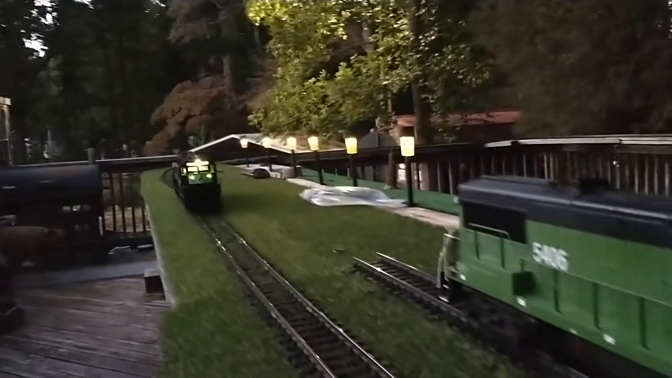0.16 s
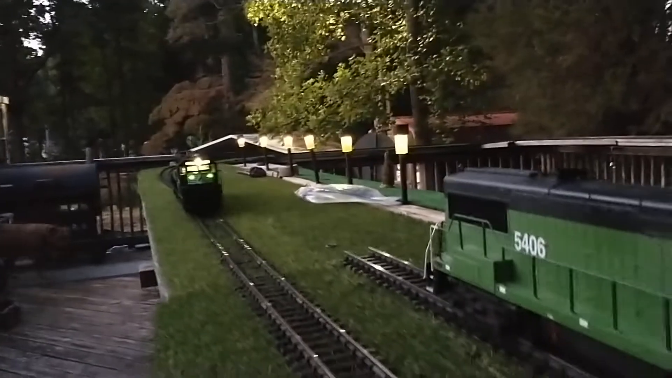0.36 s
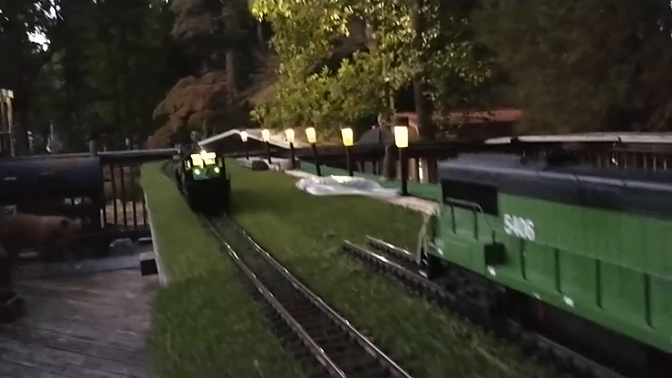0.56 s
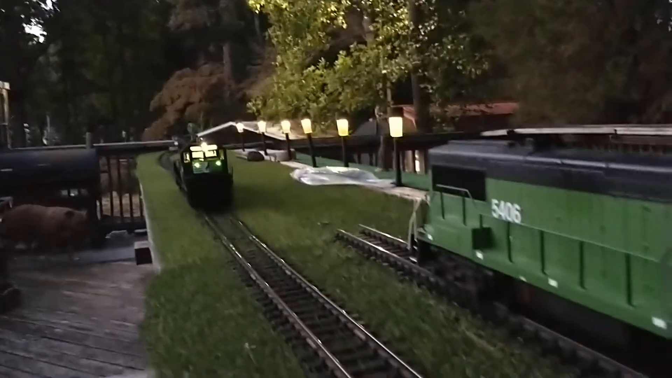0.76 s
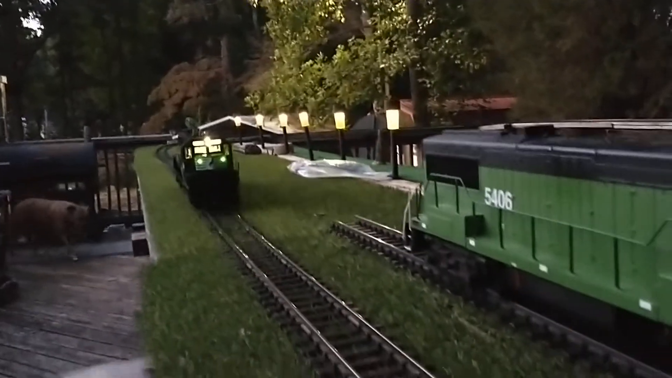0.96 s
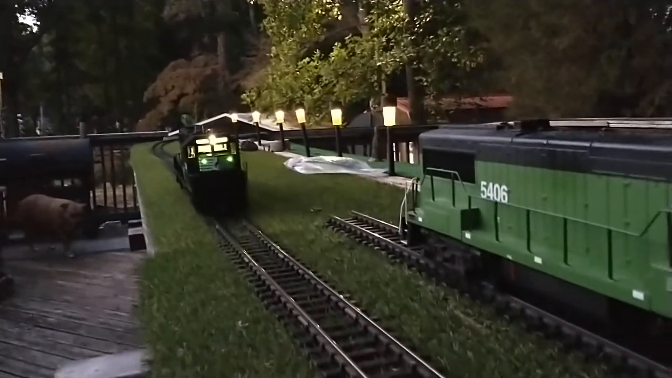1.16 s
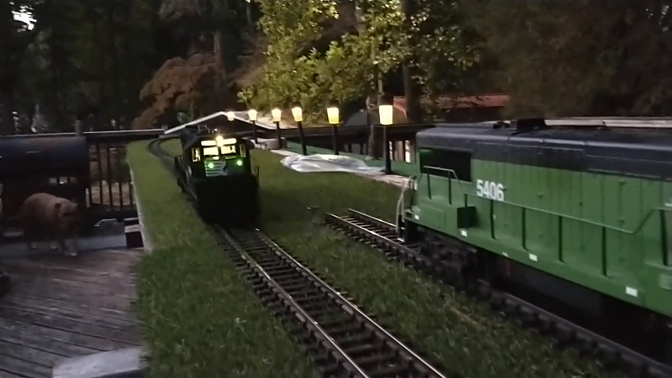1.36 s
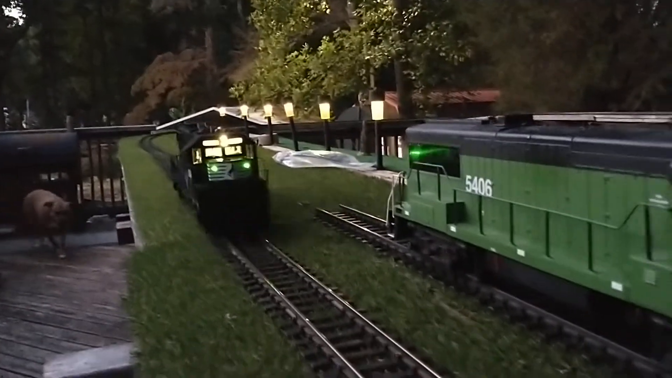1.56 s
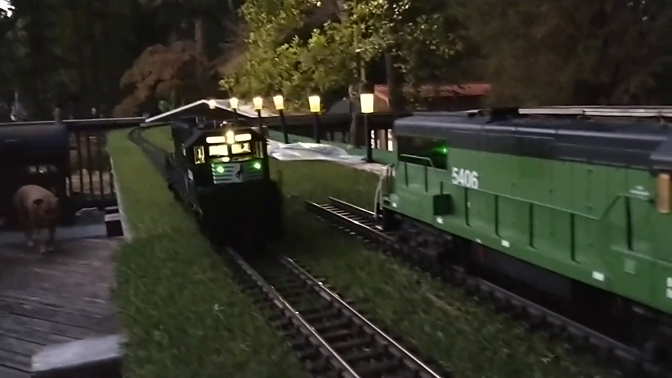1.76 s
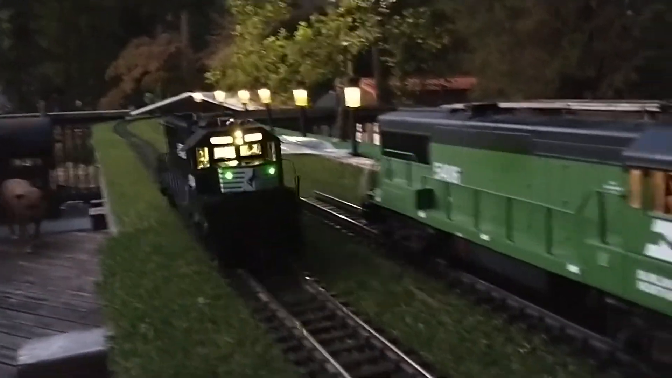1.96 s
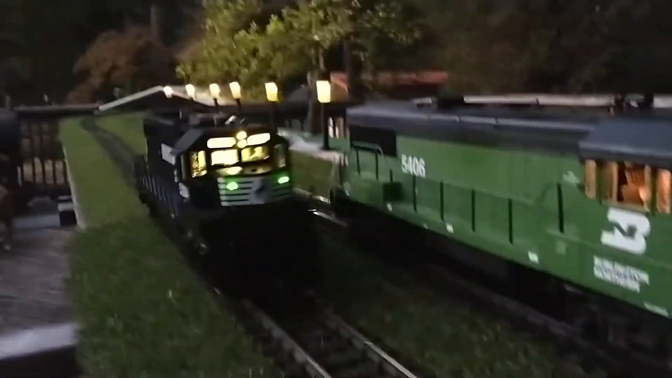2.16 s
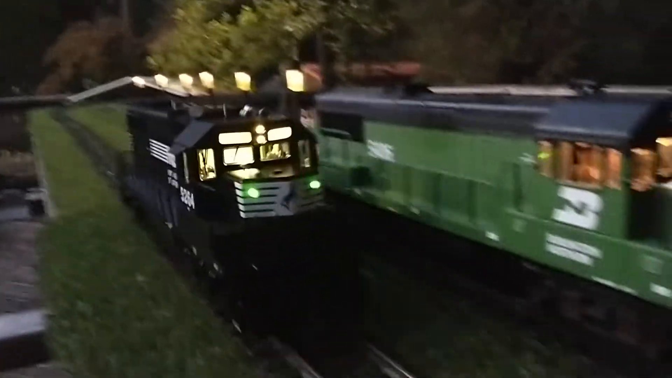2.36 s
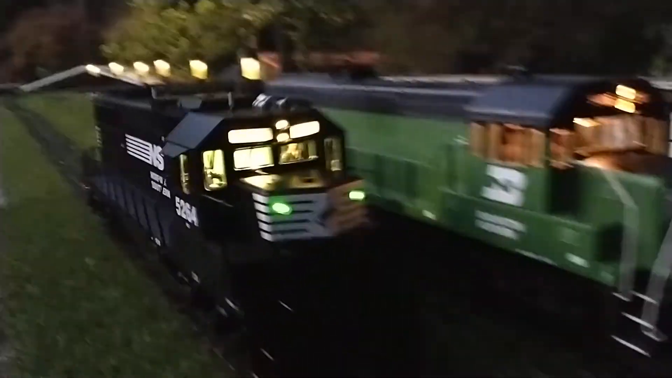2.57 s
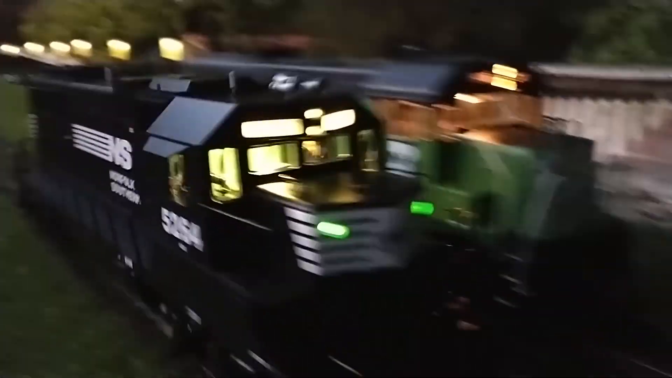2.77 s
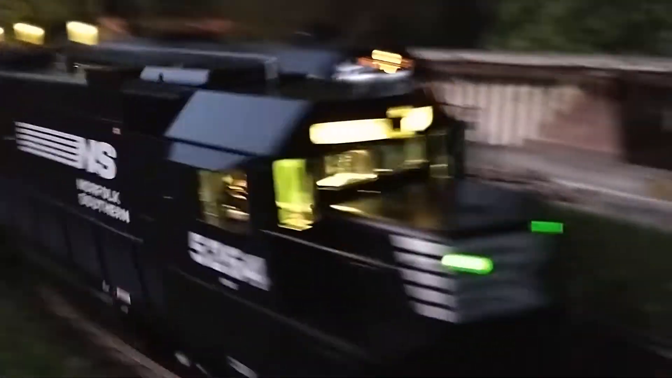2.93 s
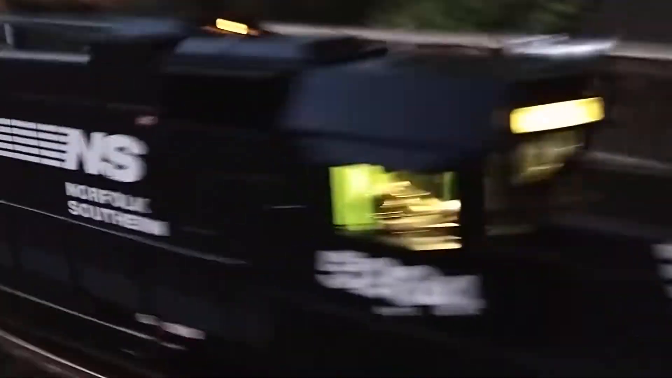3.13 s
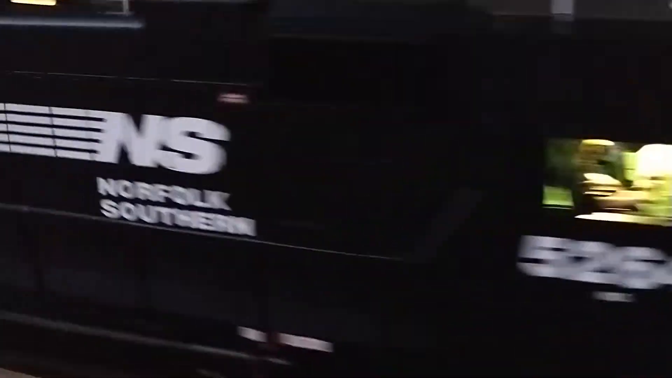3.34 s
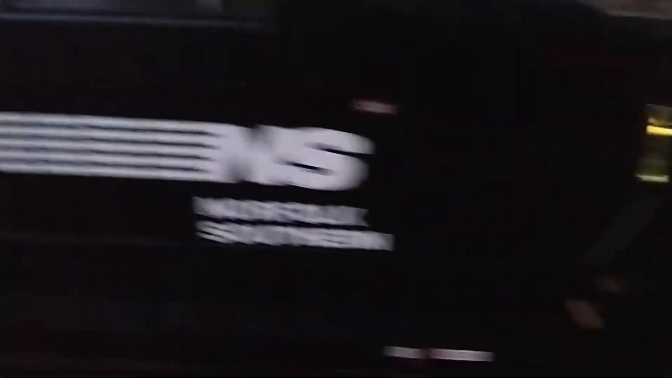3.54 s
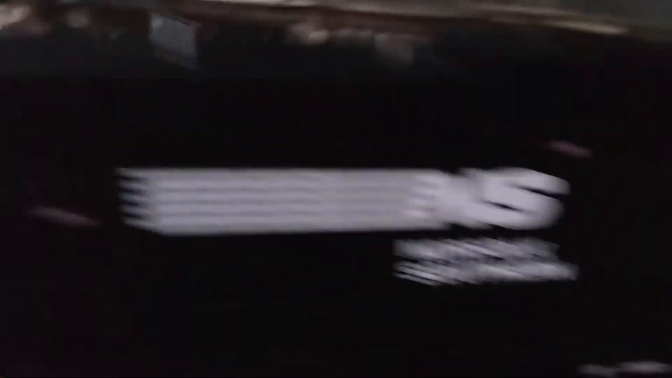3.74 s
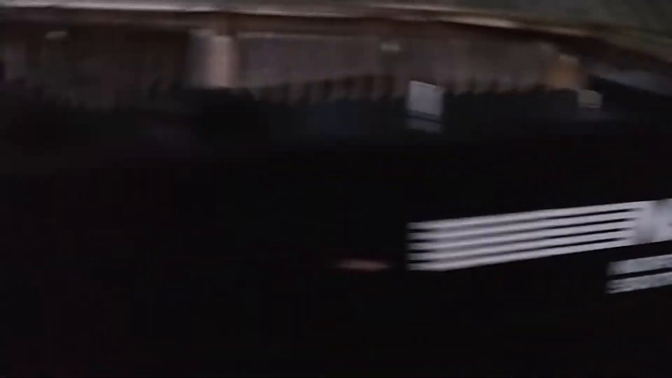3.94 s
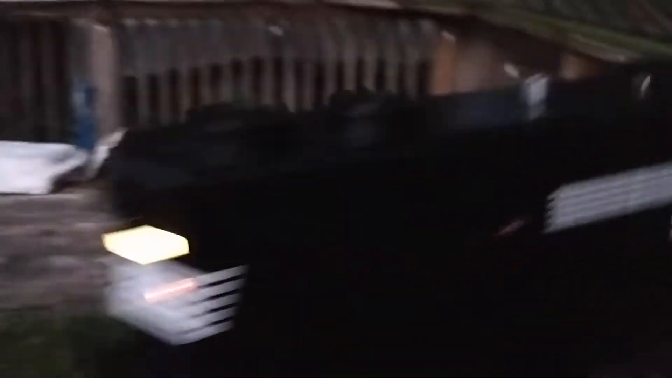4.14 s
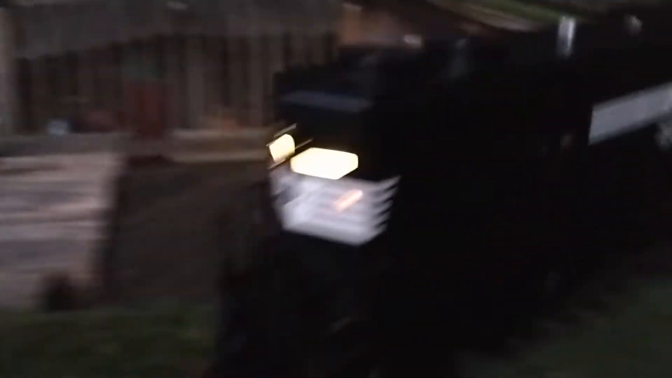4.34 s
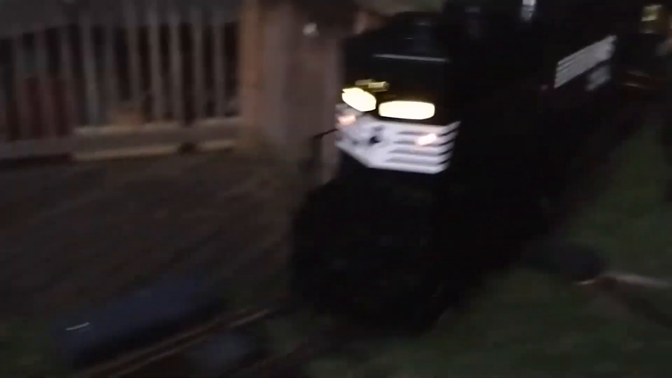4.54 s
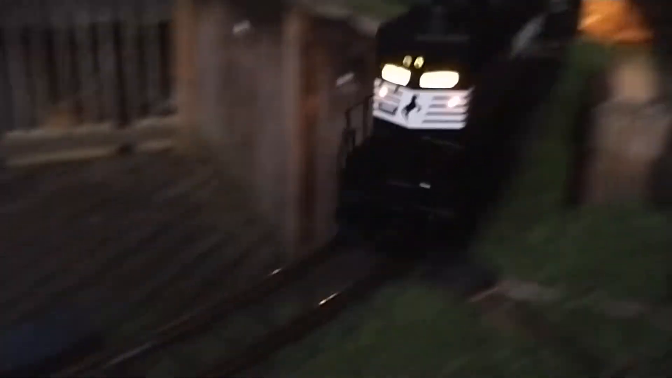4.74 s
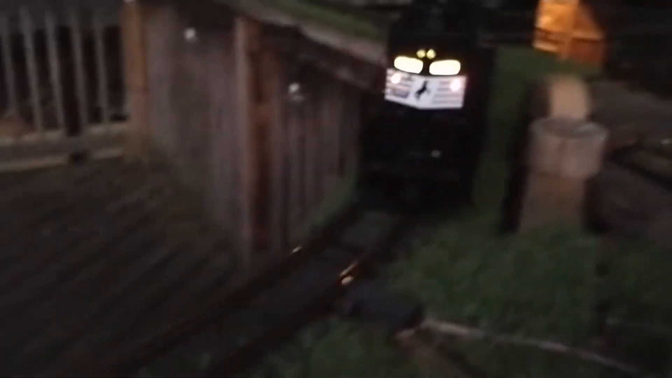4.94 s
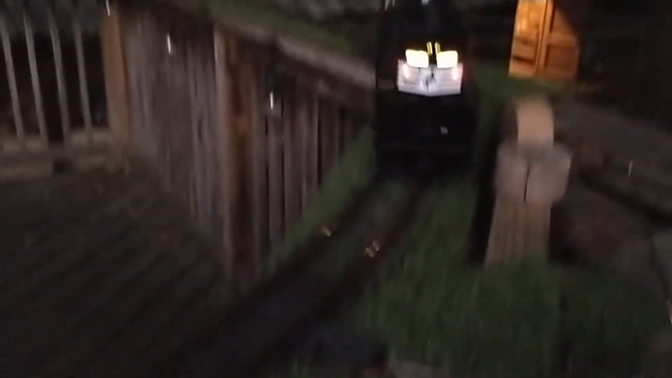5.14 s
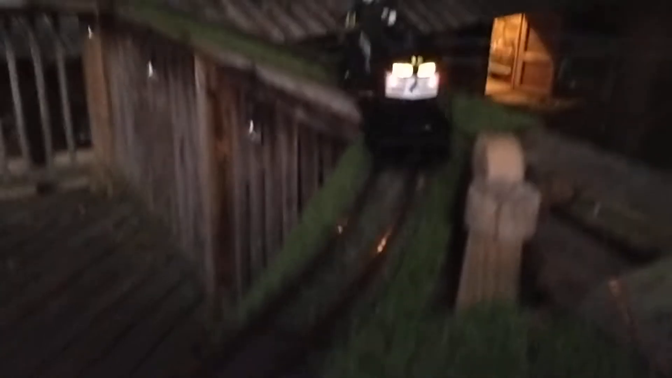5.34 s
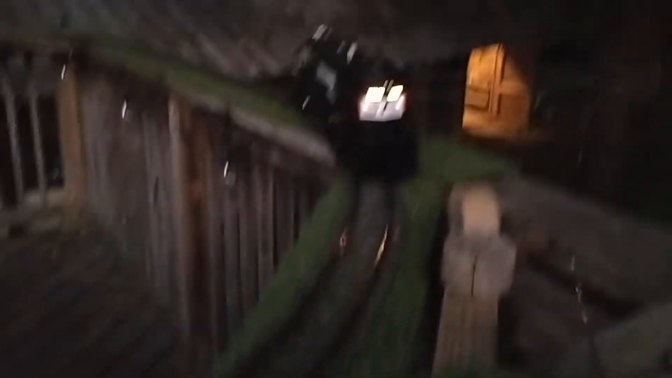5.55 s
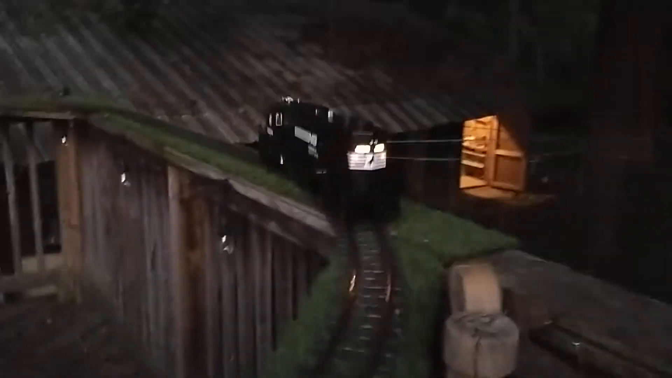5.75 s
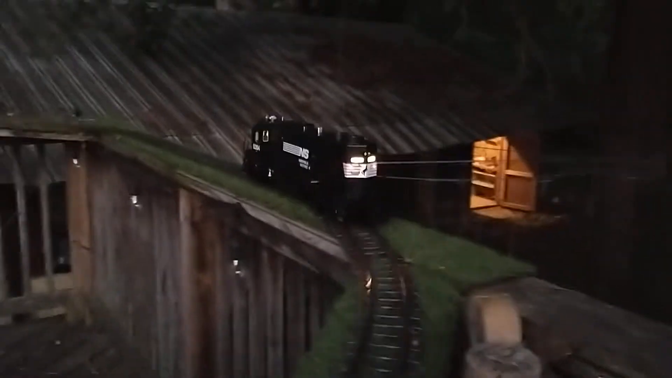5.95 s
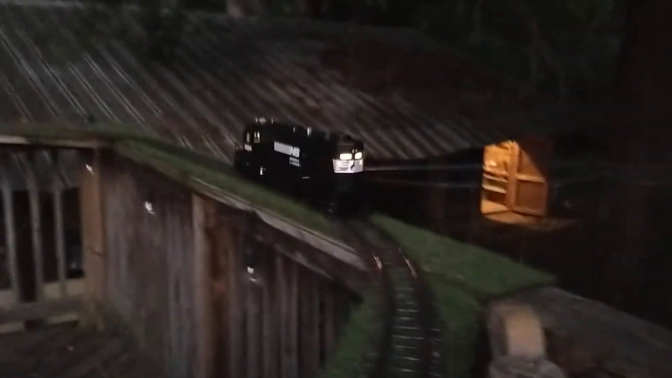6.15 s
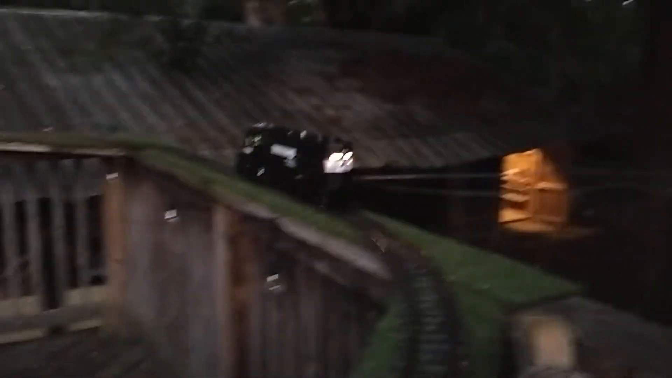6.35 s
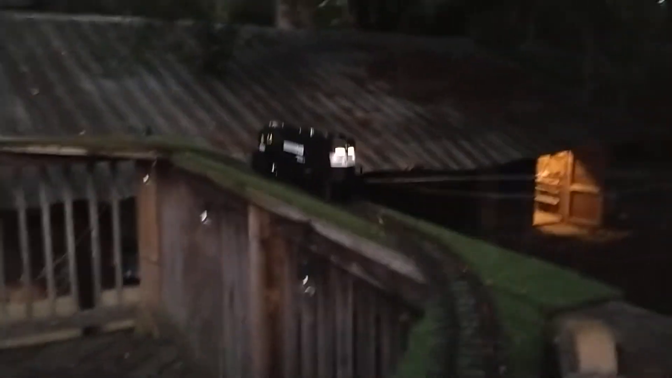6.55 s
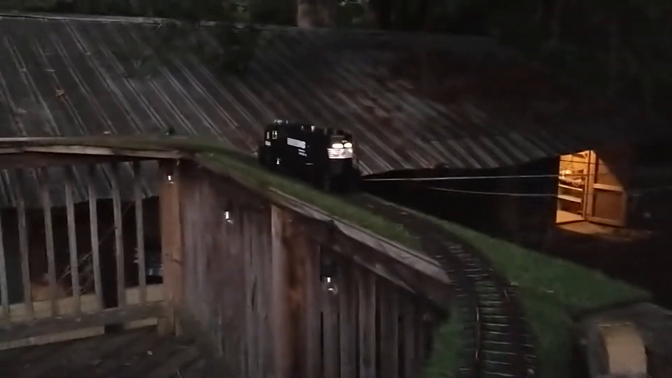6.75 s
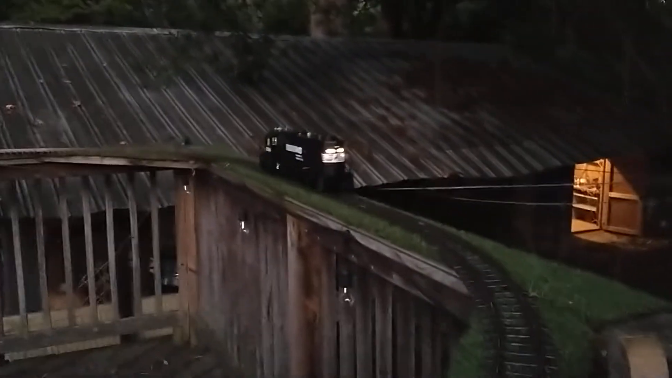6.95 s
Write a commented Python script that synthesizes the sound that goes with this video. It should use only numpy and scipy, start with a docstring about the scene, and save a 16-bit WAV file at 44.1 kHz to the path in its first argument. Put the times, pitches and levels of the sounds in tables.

```python
"""A garden-railway diesel rolls up amid insects, mains hum and low outdoor rumble, already rattling and hissing.
Gear trains knock in the plastic shell, the front motor sums shaft orders, wheel hiss is coloured noise.
Dull knocks come from stock further off; then noise bursts click as wheels cross joints and specks.
At about 1.8 s a pulse of pressure bumps the right microphone port. The train passes close between 3 and 5 s,
flanges grinding amid hoarse motor and gear notes (narrow noise bands), then runs off round a curve."""
import sys
import numpy as np
from scipy import signal
from scipy.fft import rfft, irfft, next_fast_len
from scipy.io import wavfile
from scipy.ndimage import uniform_filter1d, map_coordinates

SR = 44100
rng = np.random.default_rng(int(sys.argv[2]) if len(sys.argv) > 2 else 0)


def put_to_file(sound):
    """Save the sound as 16-bit audio at rate SR, in the file named by the first command-line argument."""
    columns = np.atleast_2d(sound).T  # one column per channel
    safe = np.clip(columns, -1, 1)
    whole_steps = np.round(safe * 32767)
    wavfile.write(sys.argv[1], SR, whole_steps.astype(np.int16))


N = 308724

# stereo width of the train: freq_hz, side_minus_mid_db
TRAIN_WIDTH = [(60, -23), (150, -14.5), (380, -11), (950, -5), (2380, -2), (5980, -2.5), (15000, -2)]
# gearbox going by: nearest_s, level_db, distance_m, fall_per_doubling_db, ahead_over_abeam_db
GEARBOX_PASS = (3.75, -40.3, .43, 18.4, -1)


def amp(db):
    """Decibels to gain."""
    return 10 ** (np.asarray(db) / 20)


def unit(x):
    """Scale to rms 1."""
    return x / np.sqrt(np.mean(x ** 2) + 1e-20)


def along(points, hz):
    """Interpolate (Hz, value) points on a log frequency axis."""
    f, v = np.transpose(points)
    return np.interp(np.log(hz + 1), np.log(f + 1), v)


def curves(rows):
    """One value per sample for each column after the time in seconds."""
    s, *cols = np.transpose(rows)
    return [np.interp(np.arange(N) / SR, s, c) for c in cols]


def wobble(knots_per_s):
    """A smooth random curve through normal-distributed knots."""
    knots = rng.standard_normal(int(N * knots_per_s / SR) + 4)
    return map_coordinates(knots, [np.arange(N) * knots_per_s / SR])


def swell(middle_s, half_s):
    """A smooth rise and fall of height 1."""
    return np.exp(-((np.arange(N) / SR - middle_s) / half_s) ** 2)


def filtered(x, response):
    """Multiply the spectrum of x by a response of frequency."""
    n = x.shape[-1]
    m = next_fast_len(2 * n)
    return irfft(rfft(x, m) * response(np.fft.rfftfreq(m, 1 / SR)), m)[..., :n]


def resonance(hz, centre_hz, width_hz):
    """Response of one damped mode."""
    damping = 1j * hz * width_hz
    return damping / (centre_hz ** 2 - hz ** 2 + damping)


def smooth_field(shape, bins, frames):
    """Random field smoothed over frequency bins and time frames."""
    field = uniform_filter1d(rng.standard_normal(shape), size=bins, axis=0)
    return uniform_filter1d(field, size=frames, axis=1)


def noise(patchy_db):
    """Two noises whose level drifts, within bounds, in patches of time and frequency."""
    z = signal.stft(rng.standard_normal((2, N)), nperseg=1024)[2]
    field = smooth_field(z.shape[1:], bins=3, frames=14)
    patchy = z * amp(patchy_db * np.tanh(unit(field)))
    return unit(signal.istft(patchy, nperseg=1024)[1][:, :N])


def mid_side(mid, side):
    """Decode mid and side to stereo of rms 1."""
    return unit(np.array([mid + side, mid - side]))


def radiate(pair, spectrum, width):
    """Colour two signals and spread them as mid and side."""
    def response(hz):
        side_gain = amp(along(width, hz))
        return amp(along(spectrum, hz)) * np.array([np.ones_like(hz), side_gain])

    return mid_side(*filtered(pair, response))


def pass_db(nearest_s, level_db, distance_m, fall_db, ahead_db=0):
    """Level of a part going by: falls with distance and may be thrown forward or back."""
    travel_m_per_s = 0.5
    past_m = travel_m_per_s * (np.arange(N) / SR - nearest_s)
    reach_m = np.hypot(past_m, distance_m)
    return level_db - fall_db * np.log2(reach_m / abs(distance_m)) - ahead_db * past_m / reach_m


def garden():
    """Distant rumble and air, slowly fading insect choruses and a mains hum."""
    # air colour: freq_hz, relative_db_per_hz
    air_colour = [(25, -29), (45, -9), (75, 1), (115, 3.5), (190, -2.5), (310, -7), (560, -4), (800, -5),
                  (1350, -12), (1900, -23.5), (3300, -26.5), (6000, -23.5), (10000, -32.5), (15800, -34.5)]
    # stereo width of the air: freq_hz, side_minus_mid_db
    air_width = [(60, -23), (180, -7), (550, -6.5), (1650, 6.5), (4970, 0), (15000, 2)]
    # insect choruses: centre_hz, nominal_width_hz, start_level_db, fade_db_per_s
    insects = [(2270, 200, -72, .55), (4185, 300, -69.7, .1)]
    # mains hum: freq_hz, level_db
    hum = [(120, -78.5), (240, -70.5)]

    out = amp(-63.5 + 0.87 * wobble(6.1)) * radiate(noise(patchy_db=3.5), air_colour, air_width)
    t = np.arange(N) / SR
    for centre_hz, width_hz, start_db, fade_db_per_s in insects:
        mode = lambda hz: resonance(hz, centre_hz, 2 * width_hz) ** 2
        chorus = filtered(rng.standard_normal((2, N)), mode)
        level_db = start_db - fade_db_per_s * t + 1.1 * wobble(12) + 0.9 * wobble(2)
        out += amp(level_db) * unit(chorus)
    for hz, level_db in hum:
        out += np.sqrt(2) * amp(level_db + 1.2 * wobble(4.02)) * np.sin(2 * np.pi * hz * t)
    return out


def shaft(ratio, flutter):
    """Revolutions made by a motor whose speed flutters a little at random."""
    # motor speed at ratio 1: time_s, revs_per_s
    speed = [(0, 137.5), (2.45, 138), (2.9, 137.5), (3.15, 136.4), (3.35, 137), (3.55, 136.6),
             (3.85, 136.7), (4.0, 137.4), (4.1, 136.9), (4.25, 138.3), (4.45, 138.4), (4.75, 137.5),
             (7, 137.4)]
    revs_per_s = ratio * curves(speed)[0] * (1 + flutter * wobble(28))
    return np.cumsum(revs_per_s) / SR


def rattle_swells():
    """The rattle swells and sinks, early on from another locomotive."""
    # middle_s, half_s, change_db
    swells = [(.3, .2, 6), (2.2, .2, -2.5), (2.74, .11, 3), (3.13, .05, 3), (3.22, .025, -3),
              (3.37, .05, 3.5), (3.49, .04, 2), (3.87, .05, 2.5), (4.06, .04, 1), (4.21, .03, 2),
              (4.39, .025, -5), (4.5, .07, 2.5), (4.69, .05, 2.5), (5.1, .1, 1.5), (5.55, .2, -3),
              (6.13, .15, -7), (6.43, .08, 3)]
    return sum(db * swell(s, half_s) for s, half_s, db in swells)


def backlash(turns, scatter_db, jitter_s, ring_s):
    """Loose gears knock once a revolution; the shell scatters each knock."""
    at = np.flatnonzero(np.diff(np.floor(turns)))
    late, size = rng.standard_normal((2, len(at)))
    jittered = np.clip(at + jitter_s * SR * late, 0, N - 1).astype(int)
    impulses = np.bincount(jittered, amp(scatter_db * size), N)
    t = np.arange(SR // 20) / SR
    shell = rng.standard_normal((2, len(t))) * amp(-60 * t / ring_s)  # ring_s: decay by 60 dB
    return unit(signal.fftconvolve(impulses[None], shell, axes=1)[:, :N])


def clacks(per_s, scatter_db, ring_s):
    """Worn teeth catch at random, each with a short noise burst of its own colour."""
    t = np.arange(SR // 50) / SR
    at = np.flatnonzero(rng.random(N) < per_s / SR)
    size = amp(scatter_db * np.clip(rng.standard_normal(len(at)), -2, 2))
    bursts = rng.standard_normal((len(at), 2, len(t))) * amp(-60 * t / ring_s) * size[:, None, None]
    where = (at[:, None] + np.arange(len(t))).ravel()
    return unit(np.array([np.bincount(where, bursts[:, port].ravel(), N)[:N] for port in range(2)]))


def gears(front, rear, swell_db):
    """Two gear trains knock and churn in the shell, throbbing with the axle; the chassis rumbles."""
    # shell and chassis colours: freq_hz, relative_db_per_hz
    shell_colour = [(260, -38), (450, -21), (513, -19.5), (630, -11), (678, -5), (761, -12), (1100, -4),
                    (1290, -6), (1390, -3), (2040, -11.5), (2250, -20), (2600, -14.5), (3200, -23),
                    (4160, -48), (7040, -120)]
    chassis_colour = [(25, -41), (50, -16.5), (110, -2.5), (190, -5), (270, -3.5), (340, -7), (420, -5),
                      (520, -10), (700, -5), (1100, -37)]
    # nearest_s, level_db, distance_m, fall_per_doubling_db, ahead_over_abeam_db
    chassis_pass = (3.85, -52, .5, 15, .5)

    knocking = sum(backlash(turns, scatter_db=3, jitter_s=.0001, ring_s=.014) for turns in (front, rear))
    churn = noise(patchy_db=5.0) * amp(.6 * np.cos(2 * np.pi * front) + 1.3 * wobble(170))
    catching = clacks(per_s=70, scatter_db=2.2, ring_s=.018)
    mix = 0.32 * knocking + 0.45 * catching + churn

    axle = front / 20.0  # worm-drive reduction
    throb_db = 0.8 * np.cos(2 * np.pi * axle) + 0.7 * wobble(20)
    rattle_db = pass_db(*GEARBOX_PASS) + swell_db + throb_db
    rattle = amp(rattle_db) * radiate(mix, shell_colour, TRAIN_WIDTH)

    rumble_db = pass_db(*chassis_pass) + .6 * swell_db + 0.8 * wobble(25)
    rumble = amp(rumble_db) * radiate(noise(patchy_db=4), chassis_colour, TRAIN_WIDTH)
    return rattle + rumble


def noise_bands(drive, bands):
    """A rough drive feeds resonances, each swelling at its own moments."""
    out = np.zeros((2, N))
    for centre_hz, width_hz, swells in bands:
        # two equal stages narrow the peak, so each is made wider
        ring = filtered(drive(), lambda hz: resonance(hz, centre_hz, 1.5 * width_hz) ** 2)
        level = sum(amp(db) * swell(s, half_s) for s, half_s, db in swells)
        out += level * mid_side(ring[0], amp(along(TRAIN_WIDTH, centre_hz)) * ring[1])
    return out


def hoarse_notes(turns):
    """Hoarse motor and gear notes: narrow noise bands that swell by turns, pulsing once a revolution."""
    # centre_hz, nominal_width_hz, [(middle_s, half_s, level_db), ..]
    note_bands = [(420, 45, [(4.1, .45, -62)]), (615, 55, [(3.6, .3, -59), (4.25, .3, -57)]),
                  (668, 30, [(3.24, .06, -57), (3.6, .1, -52), (4.6, .15, -57), (5.15, .22, -64)]),
                  (1095, 60, [(3.48, .05, -46.5), (3.7, .11, -50), (4.13, .11, -49.5), (4.65, .2, -61)]),
                  (1228, 50, [(3.15, .08, -55), (3.6, .2, -50.5), (4.15, .18, -49.5), (4.8, .35, -62)]),
                  (1335, 70, [(1.6, .7, -79), (2.4, .04, -60), (2.56, .05, -59), (3.28, .035, -51)]),
                  (1492, 60, [(2.7, .07, -57), (3.14, .04, -52), (3.34, .08, -47.5), (3.7, .07, -48.5),
                  (3.9, .07, -45), (4.22, .1, -50), (4.49, .07, -54), (4.9, .1, -59), (5.14, .13, -55.5),
                  (5.45, .28, -64.5)]), (1637, 45, [(1.9, .6, -75), (2.5, .2, -62), (2.78, .05, -49.5),
                  (3.1, .1, -56), (3.37, .07, -45), (3.72, .14, -49.5), (4.05, .12, -54), (5.15, .2, -60),
                  (5.55, .22, -67.5)]), (2005, 50, [(3.37, .06, -54), (3.68, .08, -52.5), (4.02, .11, -53),
                  (4.4, .3, -64), (5.15, .3, -65.5)])]
    pulse = amp(3 * np.cos(2 * np.pi * turns) + 1.5 * wobble(30))
    return noise_bands(lambda: pulse * rng.standard_normal((2, N)), note_bands)


def tone(turns, order, level_db, waver_db):
    """One shaft order; its level wavers at random, a little differently at each port."""
    waver = waver_db * np.tanh(wobble(38) + np.array([wobble(14), wobble(14)]))
    return np.sqrt(2) * amp(level_db + waver) * np.sin(2 * np.pi * order * turns)


def motor(turns, swell_db):
    """Five-pole motor: imbalance (order 1), pole hum (5), gear note (6), commutator (10), teeth (50 up)."""
    # loudest as each opening of the shell goes by: shaft_order, phase_play_revs, waver_db, swell_share,
    # [(nearest_s, level_db, distance_m, fall_per_doubling_db), ..]
    shaft_tones = [(1, .06, 3.8, 0, [(2.7, -58.5, .13, 12), (3.25, -58.3, .13, 14), (4.6, -64, .16, 7),
                   (1.2, -71, .25, 8)]), (5, .009, 2.3, 0, [(3.32, -51, .05, 16), (3.47, -46.5, .03, 14),
                   (3.72, -47.5, .07, 15), (4.11, -42.3, .13, 18), (4.46, -50, .025, 13),
                   (4.62, -55, .03, 12), (4.98, -59, .07, 13), (2.3, -73, .2, 9)]),
                   (6, .02, 3.8, 0, [(3.13, -56, .04, 9), (3.7, -56, .1, 13), (4.42, -56, .04, 9)]),
                   (10, .006, 3, .4, [(2.72, -57, .03, 12), (3.04, -48.5, .05, 12), (3.19, -46.5, .06, 14),
                   (3.8, -46.5, .1, 15), (4.5, -49, .06, 14), (1.9, -72.5, .25, 11)]),
                   (50, .0013, 3.8, 0, [(2.95, -61, .2, 9.5), (4.07, -50, .045, 14), (4.24, -51.5, .05, 14),
                   (4.6, -55.5, .07, 14), (5.5, -74, .14, 12)]), (55, .0022, 3.8, 0, [(2.6, -72, .2, 13)]),
                   (60, .002, 3.8, 0, [(2.2, -78, .14, 12), (3.05, -65, .12, 14)]),
                   (65, .0017, 3.8, 0, [(2.35, -74.5, .16, 13), (2.9, -67, .12, 14)]),
                   (70, .0014, 3.8, 0, [(4, -61, .25, 16)]), (80, .0022, 3.8, 0, [(1.7, -87, .25, 12)]),
                   (100, .0018, 3.8, 0, [(2.4, -84, .25, 12)])]
    out = np.zeros((2, N))
    for order, play_revs, waver_db, swell_share, openings in shaft_tones:
        # play in the gears shakes the phase, faster for the higher orders
        shaken = turns + play_revs * wobble(26 * order ** .45)
        power = sum(amp(pass_db(*opening)) ** 2 for opening in openings)
        level_db = 10 * np.log10(power) + swell_share * swell_db
        out += tone(shaken, order, level_db, waver_db)
    return out


def grit_crunch():
    """Gain flecked by random specks of fine grit, each dying away in about a millisecond."""
    specks_per_s, decay_s = 110, 0.0012
    size_db = 3.95 * np.minimum(rng.exponential(size=N), 3)
    specks = (rng.random(N) < specks_per_s / SR) * amp(size_db)
    t = np.arange(SR // 50) / SR
    return 1 + 0.68 * signal.fftconvolve(specks, np.exp(-t / decay_s))[:N]


def scraped(x, depth_db):
    """Brief, broad flecks of colour as the point of contact wanders over the tread."""
    z = signal.stft(x, nperseg=256)[2]
    flecks = smooth_field(z.shape[1:], bins=5, frames=7)
    return signal.istft(z * amp(depth_db * np.tanh(unit(flecks))), nperseg=256)[1][:, :N]


def tread_hiss(grit, swell_db):
    """Front and rear treads hiss on the rails; the hiss briefly swells and sinks."""
    # hiss colour: freq_hz, relative_db_per_hz
    hiss_colour = [(2350, -41), (3900, -10.5), (4340, -16), (4810, -3), (5360, -8), (6450, -4.5),
                   (6670, -6), (6950, 2.5), (7270, -5), (9690, -7.5), (12700, -19.3), (14700, -23),
                   (15800, -33)]
    # nearest_s, level_db, distance_m, fall_per_doubling_db, ahead_over_abeam_db
    front_tread_pass = (3.38, -45.6, .2, 14.8, 0)
    rear_tread_pass = (4.18, -44.8, .34, 17.2, 0)
    # middle_s, half_s, change_db
    hiss_swells = [(1.35, .12, -2), (2.6, .07, -3.5), (3.1, .14, -3), (3.62, .1, 2), (3.85, .08, 1),
                   (4.04, .05, 1), (4.22, .07, -3), (4.83, .08, -3.5), (6.37, .06, 4)]

    treads = np.hypot(amp(pass_db(*front_tread_pass)), amp(pass_db(*rear_tread_pass)))
    hiss_db = sum(db * swell(s, half_s) for s, half_s, db in hiss_swells)
    level = treads * amp(hiss_db + .25 * swell_db + 0.6 * wobble(18))
    rough = noise(patchy_db=3.5) * grit
    return level * radiate(scraped(rough, depth_db=2.5), hiss_colour, TRAIN_WIDTH)


def flanges(grit, swell_db):
    """Flanges rub along the rail and grind as they bite into its side."""
    # rub colour: freq_hz, relative_db_per_hz
    rub_colour = [(1100, -27), (1900, -3.5), (2500, -0.5), (3000, 1), (3600, 2.5), (4300, -9), (5200, -3.5),
                  (6500, -11), (8000, -12), (12000, -38)]
    # nearest_s, level_db, distance_m, fall_per_doubling_db, ahead_over_abeam_db
    front_flange_pass = (2.95, -52, .33, 13, 0.5)
    rear_flange_pass = (4.75, -55, .22, 13, -1)
    # middle_s, half_s, rub_db, grind_db
    grinds = [(1.62, .1, -70, -80), (2.73, .06, -55, -70), (3.35, .08, -58, -70), (3.68, .1, -51, -60),
              (4.4, .08, -55, -68), (4.68, .1, -64, -58), (4.95, .13, -59, -58), (5.17, .08, -60, -60),
              (5.45, .22, -72, -70), (5.77, .13, -67, -62), (6.02, .1, -73, -77), (6.4, .2, -75, -73),
              (6.5, .9, -70, -78)]

    passes = [amp(pass_db(*front_flange_pass)), amp(pass_db(*rear_flange_pass))]
    bites = [amp(rub_db) * swell(s, half_s) for s, half_s, rub_db, _ in grinds]
    rub_level = np.linalg.norm(passes + bites, axis=0) * amp(.3 * swell_db + .9 * wobble(16))
    rough = noise(patchy_db=3.5) * grit
    rub = rub_level * radiate(scraped(rough, depth_db=2.5), rub_colour, TRAIN_WIDTH)

    pressure = sum(amp(grind_db) * swell(s, half_s) for s, half_s, _, grind_db in grinds)
    rough = noise(patchy_db=3.5) * grit
    grind = unit(filtered(rough, lambda hz: resonance(hz, centre_hz=5200, width_hz=1900) ** 2))
    return rub + pressure * amp(1.6 * wobble(45)) * grind


def wheel_singing(grit):
    """Wheels sing hoarsely as they slip in the curves: gritty noise through their modes."""
    # centre_hz, nominal_width_hz, [(middle_s, half_s, level_db), ..]
    wheel_modes = [(3480, 380, [(1.6, .5, -74), (2.35, .28, -63.5), (5.4, .1, -70), (5.75, .14, -63),
                   (6.3, .4, -70)]), (4900, 450, [(3.62, .13, -56), (5.5, .15, -71), (5.77, .11, -66)]),
                   (5840, 280, [(1.7, .28, -71), (2.3, .25, -70)])]
    return noise_bands(lambda: grit * rng.standard_normal((2, N)), wheel_modes)


def rolling(swell_db):
    """Treads, flanges and singing wheels crunch the same grit."""
    grit = grit_crunch()
    return tread_hiss(grit, swell_db) + flanges(grit, swell_db) + wheel_singing(grit)


def stock_knocks(decay_s, width_hz):
    """Rolling stock further off: short blows into one broad resonance of a plastic car body."""
    # start_s, peak_db, centre_hz
    stock_blows = [(0.062, -47.5, 790), (0.102, -48.5, 850)]
    out, t = np.zeros((2, N)), np.arange(SR // 10) / SR
    for s, peak_db, centre_hz in stock_blows:
        burst = rng.standard_normal(len(t)) * amp(-60 * t / decay_s)
        blow = filtered(burst, lambda hz: resonance(hz, centre_hz, width_hz))
        out[:, round(s * SR):][:, :len(t)] += amp(peak_db) * blow / np.abs(blow).max()
    return out


def contacts():
    """Wheel blows (start_s, level_db, ring_db, body_db, left_minus_right_db): joints, lone clicks, specks."""
    # axle over a joint: start_s, level_db, second_over_first_db, ring_boost_db, body_knock_db,
    # left_minus_right_db
    rail_joints = [(0.3022, -42.5, -22, 5, 7, -1), (0.357, -54, -6, 3, 5, -1), (0.703, -52, -15, 3, 6, 0),
                   (0.906, -49.5, -15, 12, 1, 0), (1.104, -47, -20, -4, 9, -3),
                   (1.1588, -53, -5, -4, 2, -5), (1.505, -44, -18, 0, 8, -1),
                   (1.7075, -46.5, -15, 4, 5, -4), (1.9071, -39, -18, 3, 6, -5),
                   (1.9624, -43.5, 1, -4, -3, -3), (2.4436, -42, -12, -2, 0, -2),
                   (2.516, -41.5, -12, -2, 5, -4), (2.7107, -31.5, -20, -2, 6, 3),
                   (2.7673, -38, 1, -2, 2, -6), (2.8673, -37.5, -12, 0, 3, -7),
                   (3.25, -35, -4, -10, -4, -4), (3.3236, -28.5, 7.5, -1, 0, 0),
                   (3.4005, -27, -1, -12, -2, -2), (3.585, -31, -15, -3, -1, -6),
                   (3.734, -31, -15, 6, 6, -3), (3.8863, -24.5, -1, 0, -5, 3),
                   (3.9489, -25.5, -15, -3, -1, -3), (3.9597, -13.5, -25, 2, -1, 7),
                   (4.0036, -23.5, -2.5, -8, -5, 0), (4.345, -31.5, -15, 0, 3, -1),
                   (4.4826, -26.5, -.5, -2, -5, 0), (4.5559, -22.5, -8.5, 12, 3, -1),
                   (4.6367, -33.5, -15, -7, -4, -7), (4.7057, -34.5, -15, 9, 1, 4),
                   (5.1163, -35, -15, 4, -2, 3), (5.1896, -29, -20, 5, 3.5, 2), (5.2195, -41, -15, 8, 2, 6),
                   (5.8277, -48, -1, 2, 1, 2), (6.4448, -47, -15, 2, 8, 0)]
    # lone clicks and after-blows of the wheels: start_s, level_db, ring_boost_db, body_knock_db
    single_clicks = [(2.1131, -48, 0, 0), (2.3945, -42, 0, 10), (3.3475, -25, -3, -8), (3.8087, -33, 0, 0),
                     (3.963, -27, -6, 4), (4.0926, -31, 0, 0), (4.161, -32, 0, 3), (4.6124, -34, 0, 0),
                     (4.9397, -39, 4, 2), (5.135, -41, 4, 0), (5.785, -46, 2, 6), (6.648, -55, 4, 3)]
    stagger_s = 0.0183  # from the joint in one rail to the joint in the other
    ticks_per_s, tick_db, tick_scatter_db, tick_fall_db = 6, -43, 2, 12  # specks on the rails

    blows = []
    for s, db, second_db, *colour in rail_joints:
        blows += [(s, db, *colour), (s + stagger_s, db + second_db, *colour)]
    blows += [(*click, 0) for click in single_clicks]
    nearest_s, _, distance_m, *_ = GEARBOX_PASS
    ticks_db = pass_db(nearest_s, tick_db, distance_m, tick_fall_db)
    ticks_db = ticks_db + tick_scatter_db * rng.uniform(-1, 1, N)
    at = np.flatnonzero(rng.random(N) < ticks_per_s / SR)
    return blows + [(i / SR, ticks_db[i], 0, 0, 0) for i in at]


def wheel_clicks(decay_s, rise_share, bounce_s, bounce_db, tail_s, tail_db, ring_width_hz):
    """Wheels click at rail joints, on specks and singly: noise bursts with a bounce and a brief ring."""
    # click colour: freq_hz, gain_db
    click_colour = [(300, -16), (1400, 2.5), (2800, -4.5), (4200, -9), (5000, -2.5), (7200, 2.5),
                    (10000, -1.5), (12500, -7.5), (15500, -13)]
    ring_ahead_hz, ring_behind_hz, ring_turn_s = 6330, 5100, 3.99  # heard from front, then from behind
    out, t = np.zeros((2, N + SR)), np.arange(SR // 10) / SR
    for s, db, ring_db, body_db, pan_db in contacts():
        ring_hz = ring_ahead_hz if s < ring_turn_s else ring_behind_hz
        # a really hard blow is a cleaner, shorter strike that sets the whole wheel ringing
        hard = np.clip((db + 22.5) / 5, 0, 1)
        length_s = decay_s * (1 - hard / 2)
        contact = lambda u: (1 - np.exp(-u / (rise_share * length_s))) * amp(-60 * u / length_s)
        bounce = contact(np.maximum(t - bounce_s * rng.uniform(0.56, 1.4), 0))
        tail = amp(tail_db - 60 * t / tail_s)
        shape = contact(t) + (amp(bounce_db) * bounce + tail) * amp(-12 * hard)

        wheel = lambda hz: 1 + amp(ring_db + 9 * hard) * resonance(hz, ring_hz, ring_width_hz)
        body = lambda hz: body_db / (1 + (hz / 4000) ** 4)
        colour = lambda hz: amp(along(click_colour, hz) + body(hz)) * wheel(hz)
        click = filtered(shape * rng.standard_normal((2, len(t))), colour)
        click /= np.abs(click).max(axis=1, keepdims=True)
        port_db = db + 2 + np.array([[pan_db], [-pan_db]]) / 2
        out[:, round(s * SR):][:, :len(t)] += amp(port_db) * click
    return out[:, :N]


def passing(pair):
    """The lead of one port over the other swings as the locomotive goes by."""
    # time_s, left_lead_s
    bearing = [(0, .00011), (2.3, .0001), (3.2, .00025), (3.7, .00028), (4.25, .00013), (4.75, -.00003),
               (7, 0)]
    half = curves(bearing)[0] * SR / 2
    left, right = pair
    shifted = lambda x, shift: map_coordinates(x, [np.arange(N) + shift], order=5)
    return np.array([shifted(left, half), shifted(right, -half)])


def port_colour(pair):
    """The two ports differ in response; each takes half the difference."""
    # freq_hz, left_minus_right_db
    port_balance = [(150, 0), (700, 0), (1250, -3.5), (1800, -0.5), (2700, 4.5), (4200, 1.5), (6400, 1.5),
                    (9300, -3), (15000, -3)]
    return filtered(pair, lambda hz: amp(np.outer([1, -1], along(port_balance, hz)) / 2))


def bump(at_s, db, decay_s, low_hz):
    """A single push of pressure on the right port, without its deepest bass."""
    t = np.arange(N) / SR - at_s
    push = (t > 0) * np.exp(-np.abs(t) / decay_s)
    push = filtered(push, lambda hz: hz ** 4 / (hz ** 4 + low_hz ** 4) / (1 + 1j * hz / 1800))
    return np.outer([0, 1], amp(db) * push)


def scene():
    """Locomotive and garden, coloured by the two ports, plus the bump."""
    front, rear = shaft(ratio=1, flutter=0.00176), shaft(ratio=1.09, flutter=0.01211)
    swell_db = rattle_swells()
    train = gears(front, rear, swell_db) + hoarse_notes(front) + motor(front, swell_db) + rolling(swell_db)
    train += wheel_clicks(decay_s=0.0089, rise_share=0.18, bounce_s=0.0028, bounce_db=-7.5,
                          tail_s=0.11, tail_db=-24, ring_width_hz=760)
    around = garden() + stock_knocks(decay_s=0.03, width_hz=210)
    heard = port_colour(passing(train) + around)
    return heard + bump(at_s=1.778, db=-23.0, decay_s=0.0048, low_hz=72)


def record(dry):
    """Sharp band limit: nothing is kept from top_hz up."""
    top_hz = 15800
    return filtered(dry, lambda hz: hz < top_hz)


dry = scene()
out = record(dry)
put_to_file(out)
```